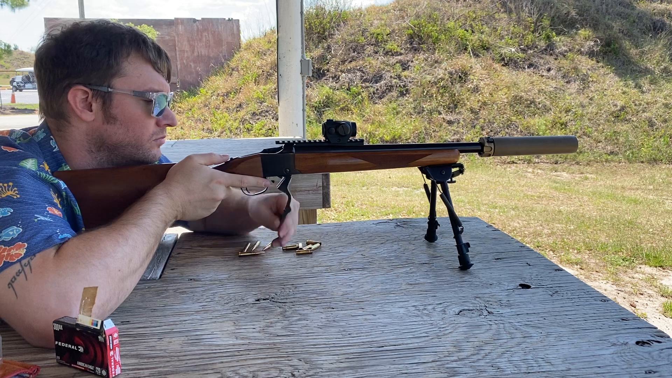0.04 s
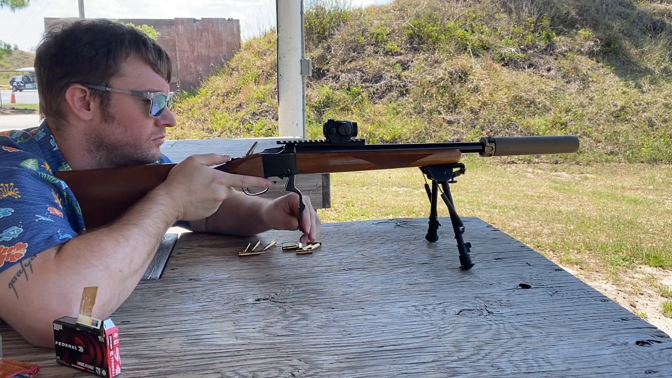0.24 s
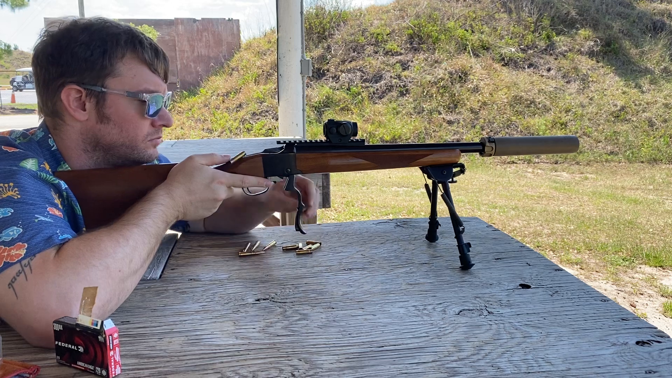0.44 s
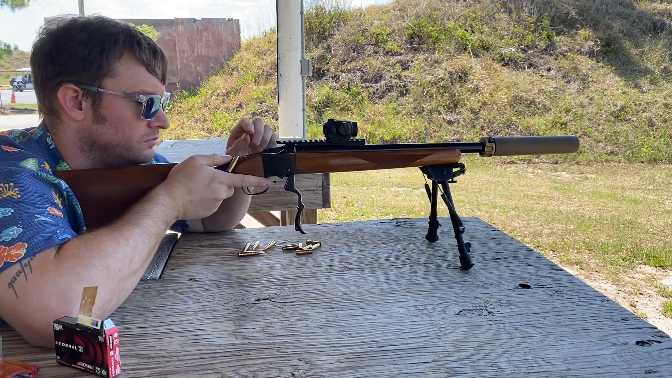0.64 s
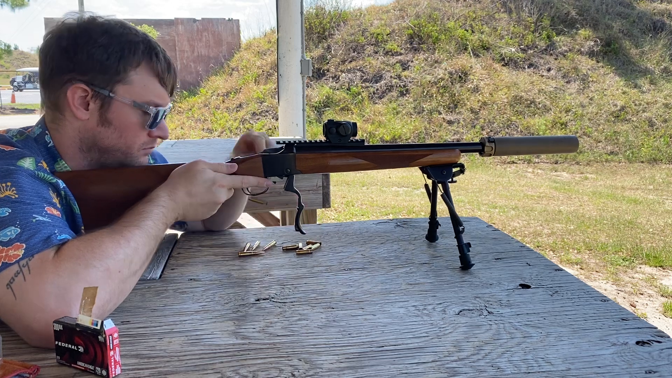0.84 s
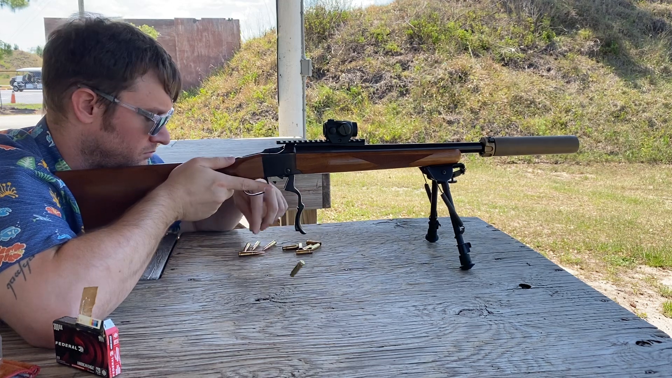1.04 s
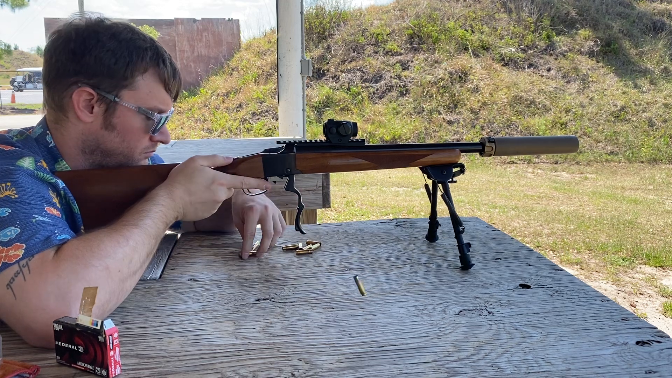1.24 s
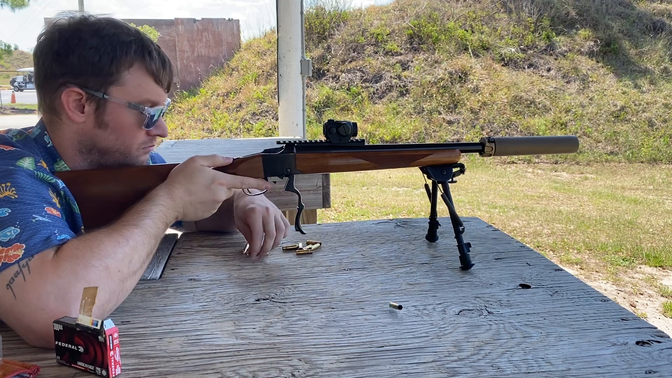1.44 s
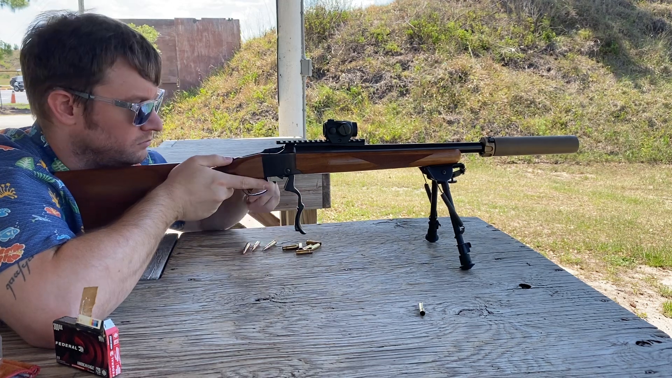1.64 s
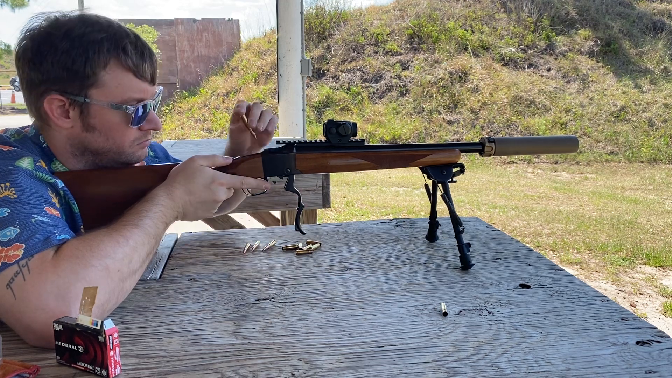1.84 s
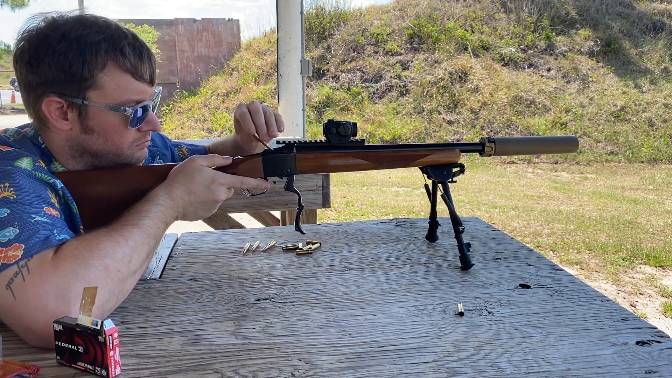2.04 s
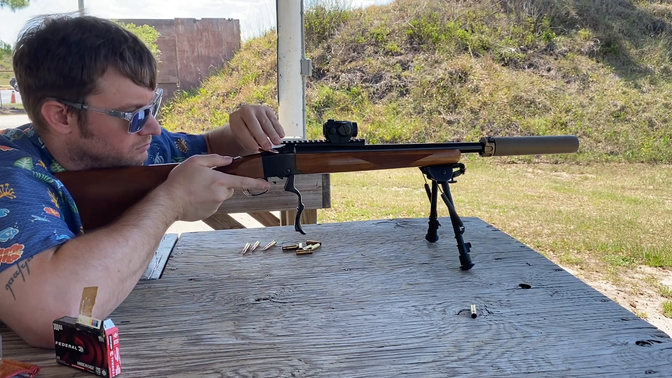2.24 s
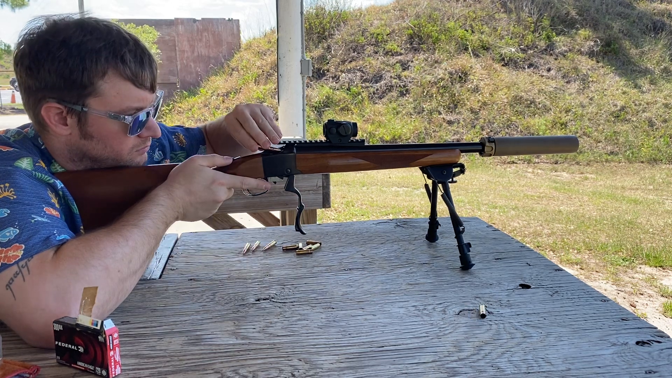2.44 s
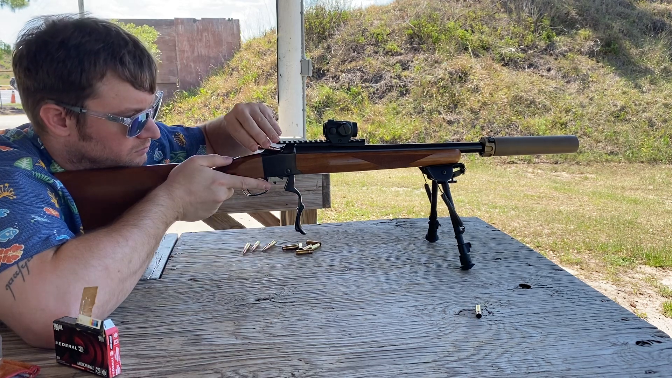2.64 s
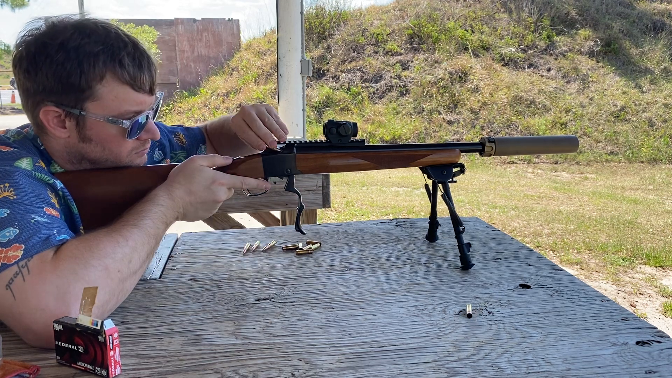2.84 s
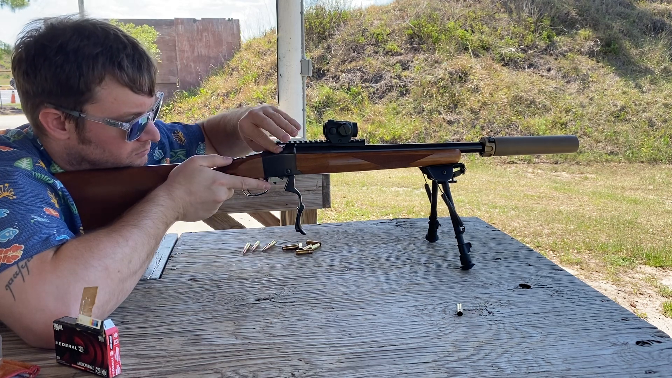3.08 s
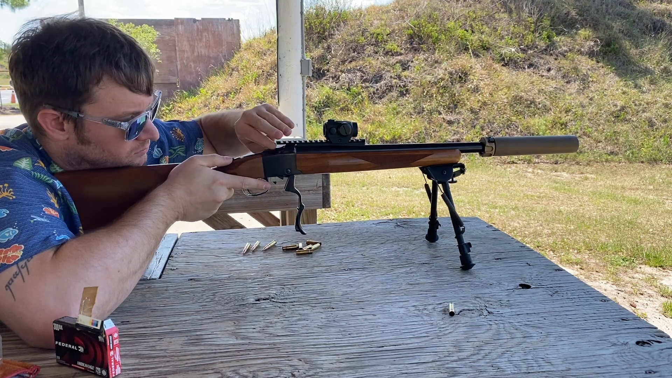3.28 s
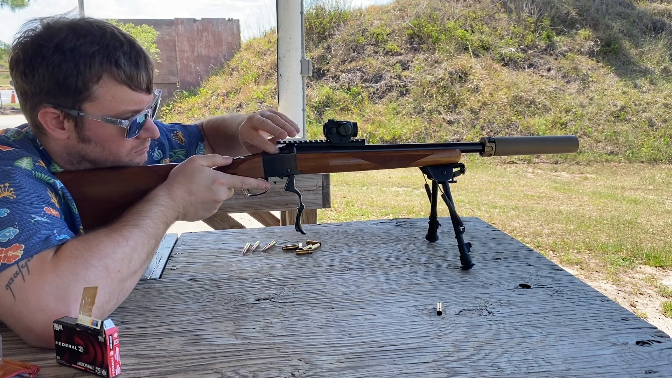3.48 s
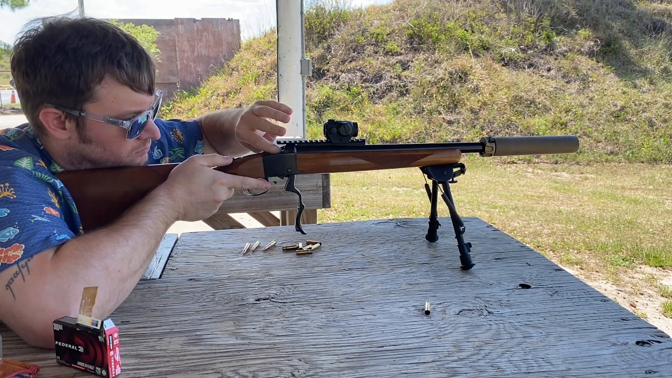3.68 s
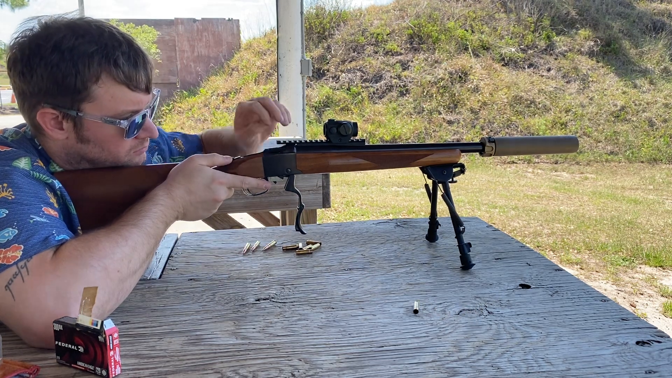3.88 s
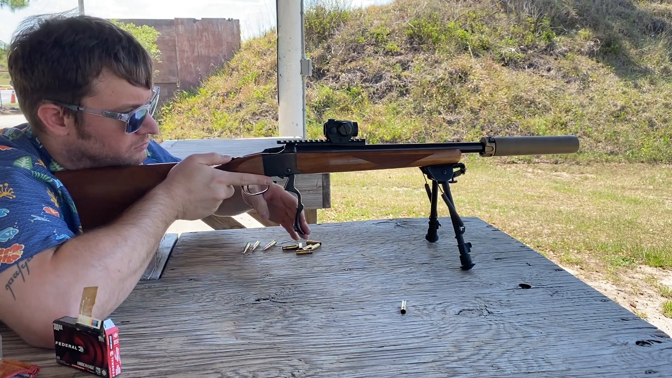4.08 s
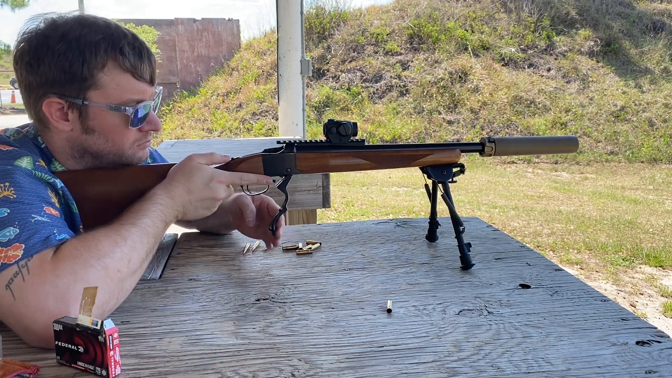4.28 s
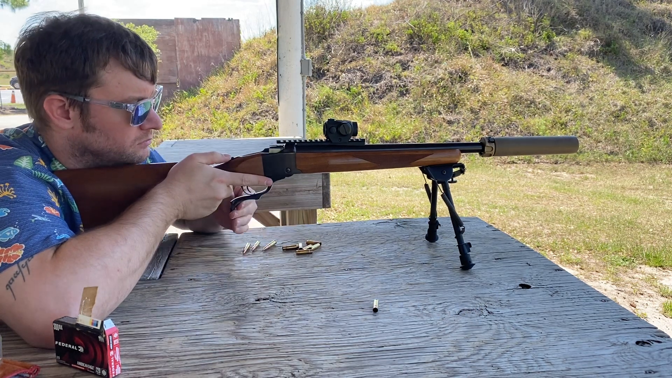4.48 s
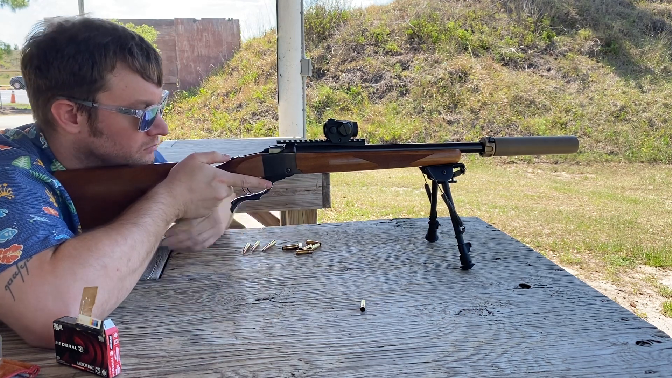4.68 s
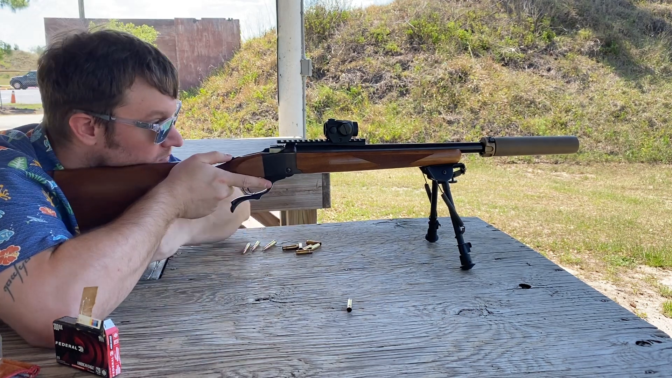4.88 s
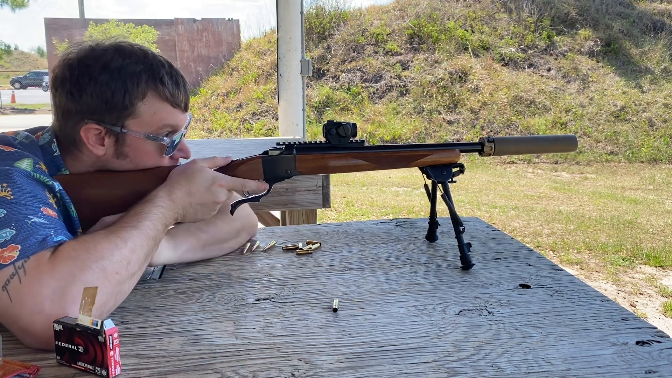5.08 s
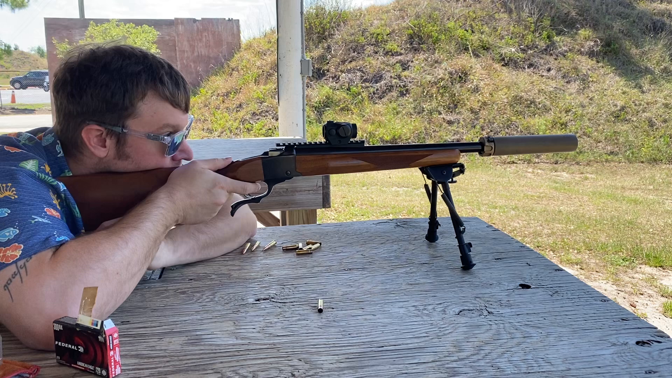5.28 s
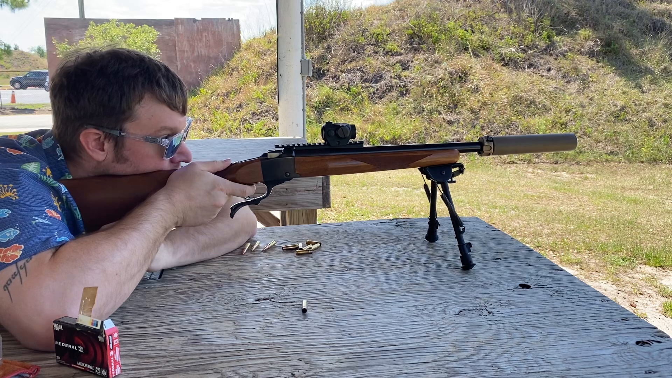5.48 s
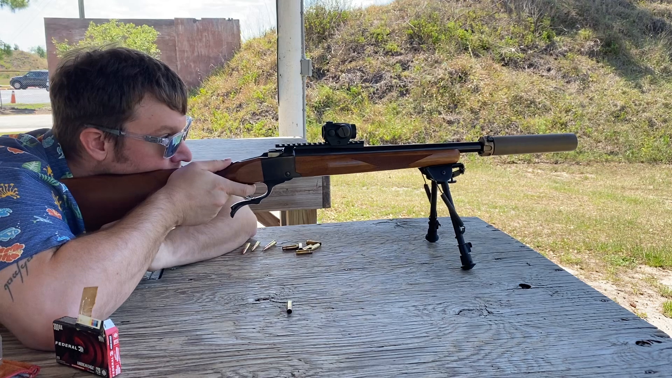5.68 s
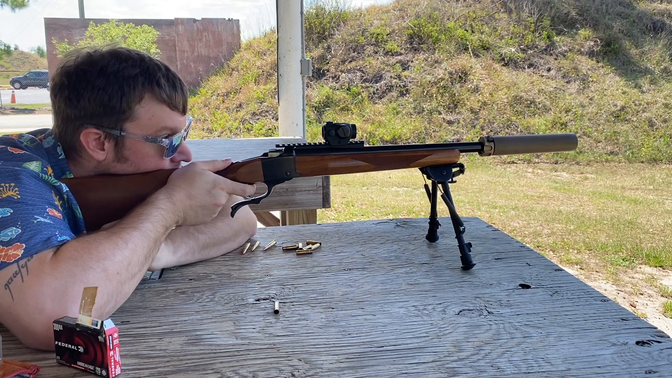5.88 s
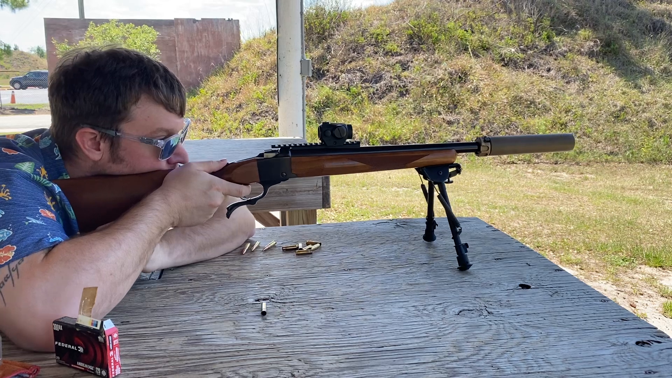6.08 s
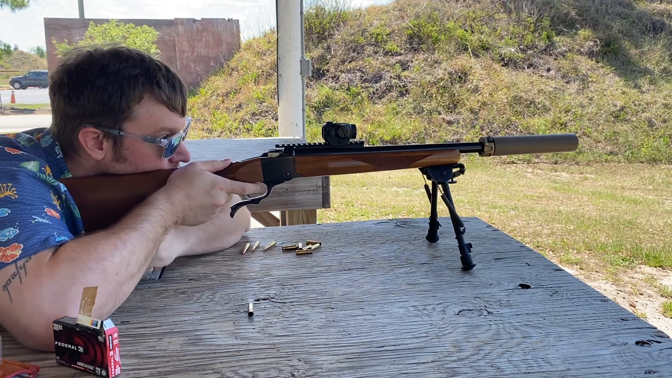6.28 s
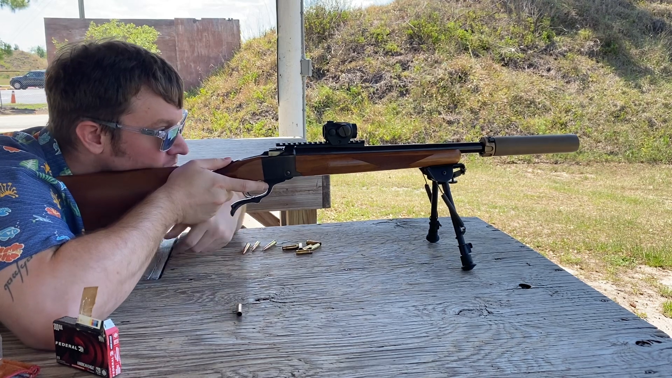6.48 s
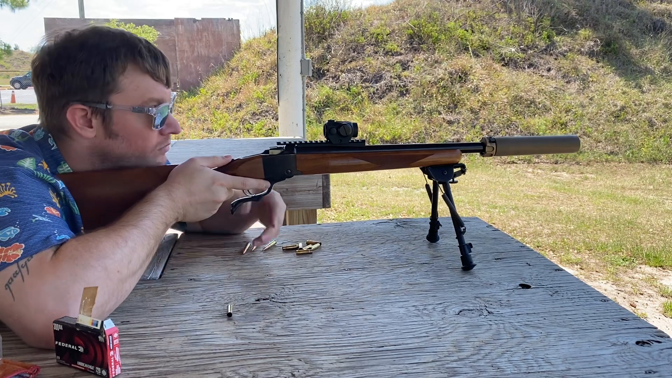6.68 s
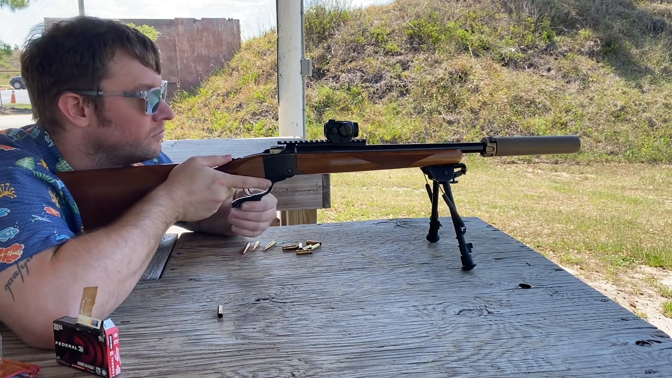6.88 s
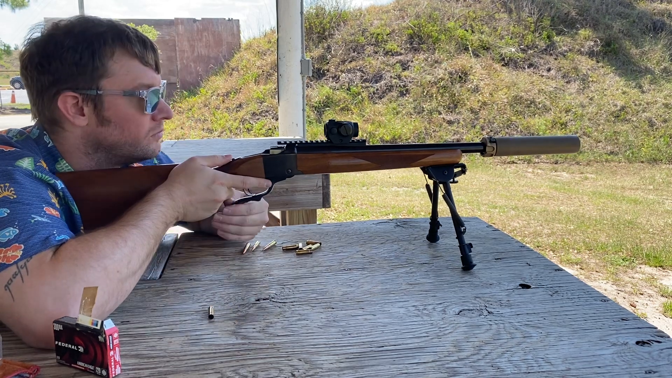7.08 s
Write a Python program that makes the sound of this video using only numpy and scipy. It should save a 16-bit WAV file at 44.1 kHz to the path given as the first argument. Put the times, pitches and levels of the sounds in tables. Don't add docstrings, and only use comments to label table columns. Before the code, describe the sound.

Stereo phone microphone about a metre from a plywood bench, under a shelter at a breezy outdoor range, with soft distant road noise and faint motor hum. From 0 to 0.55 s brass cartridges jingle brightly in fingers. At 0.96 s a spent case hits the plywood sharply, bounces with woody knocks to about 1.6 s, then rolls to rest by 2. Wind buffets low, strongest around 2.5-3.4 s; thin falling bird whistles recur from 2.2 s. Light ticks and a brief rasp at 3.0-3.2 s seat a cartridge; small clicks follow at 3.5. Two hard steel clacks land at 4.33 and 4.36 s. Soft hand pats and nudges continue to 5.9 s, a far car passing around 5.3. At 6.0 s a hammer click becomes a gas crack with a low thump, then a snap at 6.15, a flickering wash, a weaker snap at 6.37 and a duller slope echo, gone by 6.8. A faint metal tick ends it near 7.0.

```python
import sys
import numpy as np
from scipy import signal
from scipy.fft import rfft, irfft, next_fast_len
from scipy.io import wavfile
from scipy.ndimage import uniform_filter1d

SR = 44100
rng = np.random.default_rng(int(sys.argv[2]) if len(sys.argv) > 2 else 0)


def to_wav(s):
    ch = np.atleast_2d(s).T
    pcm = np.round(np.clip(ch, -1, 1) * 32767)
    wavfile.write(sys.argv[1], SR, pcm.astype(np.int16))


def voltage_ratio(decibels):
    exponent = np.asarray(decibels, float) / 20
    return 10 ** exponent


N = 313992
T = np.arange(N) / SR
BAND_HZ = 250 * 2 ** np.arange(0, 6.2, .5)
OPPOSITE = np.array([[1], [-1]])
BOTH = np.ones((2, 1))


def table(points, hz):
    p = np.array(points)
    return np.interp(np.log(np.maximum(hz, 1)), np.log(p[:, 0]), p[:, 1])


def unit(x):
    return x / np.sqrt(np.mean(x ** 2))


def noise(gain, like_hz, size=N):
    fast = next_fast_len(size)
    hz = np.arange(fast // 2 + 1) * SR / fast
    mid, side = rfft(rng.standard_normal((2, fast)))
    like = 1 / (1 + hz / like_hz)
    stereo = np.sqrt(1 + like) * mid + np.sqrt(1 - like) * side * OPPOSITE
    return unit(irfft(gain(hz) * stereo, fast)[:, :size])


def walk(rate):
    k = int(SR / rate)
    steps = np.repeat(rng.standard_normal(N // k + 1), k)
    return unit(uniform_filter1d(uniform_filter1d(steps, k), k)[:N])


def curve(rows, column):
    points = np.array(rows)
    return np.interp(T, points[:, 0], points[:, column])


def during(rows):
    inside_s = np.minimum(T - rows[0][0], rows[-1][0] - T)
    return voltage_ratio(curve(rows, 1)) * np.clip(inside_s / 0.017, 0, 1)


def pan(db):
    return voltage_ratio(db * OPPOSITE / 2)


def add(out, s, piece):
    i = int(s * SR)
    out[..., i:i + piece.shape[-1]] += piece[..., :N - i]


def fade(t, t60):
    return np.exp(-np.log(1000) * t / t60)


def swoop(t, start_hz, end_hz, glide_s):
    return 2 * np.pi * (end_hz * t + (start_hz - end_hz) * glide_s * (1 - np.exp(-t / glide_s)))


def scatter_bands():
    bands = np.array([noise(lambda hz: np.exp(-(3.4 * np.log2(hz / f + 1e-9)) ** 2), 1500, size=SR)
                      for f in BAND_HZ])
    bands[-4:, 1] = irfft(rfft(bands[-4:, 0]) * np.exp(-1.65j) * voltage_ratio(1.5), SR)
    return bands


def hits(bands, events, colour, modes, crack_s, tail_s, dull, ring_db, trim_db, place_db,
         bright_db=0, rise_s=.00025):
    out, t = np.zeros((2, N)), T[:SR // 4]
    octave = np.log2(BAND_HZ / 2000)[:, None]
    rise = 1 - np.exp(-t / rise_s)
    crack = fade(t, crack_s + 6 / BAND_HZ[:, None])
    crack = (crack + voltage_ratio(4.5) * fade(t, 0.0025 + 3 / BAND_HZ[:, None])) * rise
    tail = fade(t, tail_s * 2 ** (-dull * octave)) * (1 - np.exp(-t / .002))
    tail = tail * voltage_ratio(-1.8 * np.maximum(octave, 0))
    shake = walk(150)
    rough = voltage_ratio(3.2 * shake[:SR]) * np.exp(.55j * shake[SR:2 * SR])
    m = np.array(modes)
    dying = fade(t, m[:, 2:]) * voltage_ratio(ring_db + m[:, 1:2]) * rise
    all_luck = rng.standard_normal((len(events), 4, len(BAND_HZ), 1))
    for (s, db, tail_db, *tilt), luck in zip(events, all_luck):
        tilt_db = bright_db + sum(tilt)
        pan_db = place_db + 0.6 * luck[0, -1, 0]
        scatter_db = 2 * np.tanh(luck[3, :, 0])
        band_db = table(colour, np.minimum(BAND_HZ, 12000)) + tilt_db * octave[:, 0] / 2 + scatter_db
        gain = voltage_ratio(band_db) * np.sqrt(BAND_HZ)
        gain[-1] *= voltage_ratio(min(0.2 * (db + 5.0), 0))
        shape = gain[:, None] / np.linalg.norm(gain) * (crack + voltage_ratio(tail_db) * tail)
        i = int(s * SR) % (bands.shape[2] - len(t))
        burst = np.einsum("bct,bt->ct", bands[:, :, i:i + len(t)], shape)
        luck = luck[:, :len(m)]
        mode_hz = m[:, :1] * (1 + 0.012 * luck[0])
        ring = voltage_ratio(4 * np.tanh(luck[1])) * dying * np.exp(2j * np.pi * mode_hz * t)
        turn = np.exp(.8j * np.tanh(luck[2].T) * OPPOSITE)
        blow = burst + np.imag(turn @ ring * rough[i:i + len(t)])
        peak = np.abs(blow[:, :SR // 150]).max(1).mean()
        add(out, s, voltage_ratio(db + trim_db) * pan(pan_db) * blow / peak)
    return out


# pitch in Hz, level in dB per Hz.
AIR_COLOUR = [(120, -49), (200, -22.5), (230, 0.5), (265, -7.5), (405, -5.5), (590, -12), (960, -17.5),
              (1800, -25.5), (3110, -28.5), (8500, -42.5)]


def field():
    air = noise(lambda hz: voltage_ratio(table(AIR_COLOUR, np.minimum(hz, 8500))) / (1 + (hz / 10000) ** 7), 310)
    air = air * voltage_ratio(-59 + 0.33 * walk(4.6) + 0.27 * walk(32))
    hum_hz = 241 * (1 + 0.01 * walk(1.8))
    hum = voltage_ratio(-64.5 + 1.6 * walk(8.4)) * np.sin(2 * np.pi * np.cumsum(hum_hz) / SR)
    car_s, car_length_s, car_db = 5.326, 0.54, -64
    car = noise(lambda hz: hz / (1 + (hz / 1100) ** 4.6), 500) * voltage_ratio(car_db + 1.1 * walk(8.2))
    return air + hum + car * np.exp(-((T - car_s) / car_length_s) ** 2)


# time in seconds, gust level in dB.
GUSTS = [(0.0, -52.5), (0.6, -58), (1.0, -51), (1.48, -45.5), (1.89, -52.5), (2.21, -48.5), (3.4, -51.5),
         (4.51, -49.5), (5.19, -58.5), (5.67, -46), (5.97, -55), (6.3, -52.5), (6.974, -49.5), (7.12, -50)]
# start in seconds, peak in dB,
# pitch in Hz.
EDDIES = [(0.226, -40.5, 114.5), (0.834, -42, 126), (0.867, -39.5, 167), (0.889, -41.5, 110),
          (1.169, -38.5, 68), (1.603, -30.5, 139), (1.668, -36, 70.5), (1.966, -36, 144),
          (2.137, -33, 77.4), (2.216, -35.5, 88), (2.277, -37.5, 68.4), (2.369, -43.5, 126.4),
          (2.485, -30, 67.4), (2.569, -36.5, 188), (2.589, -26, 60.6), (2.657, -41, 143),
          (2.718, -36.5, 171), (2.749, -34.5, 96), (2.853, -40.5, 97.6), (2.971, -37, 62.6),
          (2.999, -33.5, 192), (3.258, -33.5, 92), (3.289, -34, 55.7), (3.32, -33.5, 156),
          (3.347, -33.5, 100), (3.381, -31, 68), (3.726, -36, 121), (3.954, -37.5, 101), (2.548, -48, 378),
          (2.577, -37.5, 330), (2.638, -48, 333), (2.722, -38.5, 342), (2.777, -50, 328), (2.964, -50, 350),
          (2.996, -43, 400)]
# start
# in seconds, peak in dB, pitch in Hz.
BENCH_THUDS = [(0.488, -37, 109), (.508, -38, 132), (0.528, -38, 103.5), (2.104, -30.5, 198),
               (3.508, -28, 74), (4.318, -31, 75.4), (4.669, -36, 118), (4.698, -28.5, 123.4),
               (5.659, -46, 89.6), (5.719, -43.5, 220), (6.365, -39.5, 158), (6.468, -41, 102),
               (6.508, -42, 54), (6.558, -39, 126), (6.949, -38, 90.5)]


def wind_and_thuds():
    rumble = noise(lambda hz: (hz / 50) ** 3 / (1 + (hz / 62) ** 5), 60) * voltage_ratio(3 * walk(25))
    flutter = noise(lambda hz: (hz / 150) ** 0.59 / (1 + (hz / 300) ** 5), 500) * voltage_ratio(3.5 * walk(35))
    out, shed, t = np.zeros((2, N)), np.zeros(N), T[:SR // 8]
    thumps = EDDIES + BENCH_THUDS
    for (s, db, hz), luck in zip(thumps, rng.uniform(-0.95, 1, (len(thumps), 2))):
        u = t / min(0.0086, 1 / hz)
        swell = voltage_ratio(db) * u * np.exp(1 - u)
        phase = swoop(t, 1.76 * hz, 0.835 * hz, 0.0058) + np.pi * luck[0] + 0.34 * luck[1] * OPPOSITE
        add(out, s, voltage_ratio(1.0) * swell * np.sin(phase))
        add(shed, s - .004, voltage_ratio(-12.0) * swell)
    gust_db = curve(GUSTS, 1)
    flutter_db = -63.5 + 2.1 * (gust_db + 51.5)
    return out + voltage_ratio(gust_db) * rumble + (voltage_ratio(flutter_db) + shed) * flutter


# start in seconds, peak in dB, tail in dB, treble tilt in dB.
JINGLES = [(0.0095, -44, -4, -14), (0.0604, -18.5, -18, -6.5), (0.0914, -14, -17, 4),
           (0.1377, -25.5, -1, 4), (0.1442, -16, -23, -2), (0.2092, -25.5, -16, 0), (0.238, -42.5, -4, -8),
           (0.2549, -36, -26, -14.5), (0.2614, -27, -18, -1), (0.3194, -31, -9, -11),
           (0.371, -22.5, -26, 4.5), (0.3898, -33.5, -25, -7), (0.405, -43, -23, 5),
           (0.4137, -43, -6.5, -9.5), (0.46, -41, -10, -9), (0.4743, -37.5, -10, -0.5),
           (0.5475, -40.5, -27, -5)]
# pitch in Hz, level in dB per Hz.
BRASS_COLOUR = [(590, -29), (1000, -17), (1450, -15), (2230, -4.5), (4080, -4), (10800, 1.5), (12500, 4)]
# pitch in Hz, level in dB, time to fade by 60 dB in seconds.
BRASS_RING = [(2250, -6, .04), (4660, 0, .05), (4790, -4, .04), (7190, -12, .05), (10200, -6, .03)]


def jingle(bands):
    return hits(bands, JINGLES, BRASS_COLOUR, BRASS_RING, 0.011, 0.17, 0.1, -26.0, -0.52,
                place_db=2.5, rise_s=0.00069)


def roof(near):
    t = T[:SR // 2]
    echo = noise(lambda hz: (hz > 250) / (1 + (hz / 3500) ** 2), 600, size=len(t))
    echo = echo * fade(t, 0.24) * (t > .008)
    echo = echo / np.linalg.norm(echo[0])
    return near + voltage_ratio(-14.5) * signal.fftconvolve(near.mean(0, keepdims=True), echo, axes=1)[:, :N]


# start in seconds, peak in dB,
# pitch in Hz, fade by 60 dB in seconds.
PING_NOTES = [(.061, -38.5, 2310, 0.083), (.0915, -40, 6150, 0.018), (.137, -41, 4720, 0.028),
              (.145, -31, 4870, 0.041), (.145, -36, 2330, 0.035), (0.208, -39.5, 4750, 0.061),
              (.247, -48, 2300, .02), (.277, -46.5, 2400, 0.014), (.321, -49, 2220, 0.048),
              (.321, -43, 4750, .03), (.321, -41, 6270, 0.013), (3.06, -56, 4460, .04),
              (3.035, -51, 1990, .05), (3.11, -52, 968, 0.09), (.389, -47, 4740, 0.027),
              (.389, -55, 2240, .08), (.397, -44, 4770, .03), (.405, -41, 4740, 0.02),
              (.415, -49, 4740, 0.064), (.473, -51, 4700, 0.023), (3.11, -54, 1606, 0.074),
              (3.035, -56, 980, .06), (.547, -50.5, 4880, .02), (2.1, -51, 5400, .03),
              (2.797, -55, 9700, .02), (2.815, -48, 9600, 0.022), (3.05, -47.5, 6300, .04),
              (3.052, -58, 4620, 0.057), (3.502, -46, 6400, .015), (3.507, -54.5, 5320, 0.12),
              (3.509, -48, 2600, .015), (3.522, -40.5, 2620, 0.024), (3.551, -41, 6400, 0.013),
              (3.551, -43, 2155, 0.048), (4.092, -53.5, 2400, 0.019), (4.229, -38, 5240, .01),
              (4.231, -42, 2200, 0.024), (4.246, -48, 9000, .012), (4.334, -22, 2670, 0.014),
              (4.364, -26, 2570, 0.038), (4.366, -22.5, 7180, 0.016), (6.0045, -23, 698, 0.013),
              (6.0118, -16, 810, 0.0088), (6.1473, -23, 3700, 0.0061), (6.1478, -27, 6740, 0.0074),
              (6.1476, -32, 2290, 0.0099), (6.367, -33, 2400, .008), (6.366, -35, 5770, 0.0087),
              (6.926, -61, 5420, 0.018)]


def pings():
    out, t, wobble = np.zeros((2, N)), T[:SR // 8], walk(200)
    for (s, db, hz, t60), luck in zip(PING_NOTES, rng.standard_normal((len(PING_NOTES), 1))):
        loudness = voltage_ratio(db) * fade(t, t60) * (1 - np.exp(-t / .0006))
        shaken = .4 * wobble[int(s * SR):][:len(t)]
        add(out, s, loudness * np.sin(2 * np.pi * hz * t + shaken + .9 * np.tanh(luck) * OPPOSITE))
    return out * voltage_ratio(4.5 * walk(350)) * pan(1.5)


# start in seconds, peak in dB, tail in dB.
BENCH_KNOCKS = [
    (0.1044, -30.5, 10),
    (1.115, -32.5, 10.5),
    (1.205, -30.5, -13),
    (4.0955, -35, -5),
    (1.314, -31, -10),
    (4.128, -45, -6),
]
# pitch in Hz, level in dB per Hz.
PALM_COLOUR = [(250, -7), (400, 7.5), (1500, -6.5), (3500, -38), (8000, -61.5), (16000, -64)]
# pitch in Hz, level in dB, time to fade by 60 dB in seconds.
KNOCK_RING = [(374.5, 10.5, 0.12), (912, -28.5, 0.1)]


def knocks(bands):
    return hits(bands, BENCH_KNOCKS, PALM_COLOUR, KNOCK_RING, 0.024, 0.056, 0.054, 5.3, -0.69,
                place_db=-0.5, rise_s=0.001524)


# start in seconds, peak in dB.
TUBE_NOTES = [(0.165, -51), (.21, -49), (.33, -49), (.385, -51), (.43, -57), (1.113, -52), (1.2, -53),
              (1.35, -53), (1.585, -61), (1.868, -67), (.46, -63)]
# start in seconds, peak in dB.
MOUTH_NOTES = [
    (1.11, -66),
    (1.39, -64),
]


def tubes():
    out, t = np.zeros((2, N)), T[:SR // 9]
    swell = fade(t, .25) * np.sqrt(np.abs(np.sin(np.pi * (t / t[-1]) ** .5)))
    for rows, hz in [(TUBE_NOTES, 8586), (MOUTH_NOTES, 7430)]:
        for s, db in rows:
            add(out, s, voltage_ratio(db) * swell * np.sin(2 * np.pi * hz * t + .7 * OPPOSITE))
    return out * voltage_ratio(4 * walk(90) - 2)


# start in seconds, peak in dB, tail in dB, treble tilt in dB.
BREECH_TOUCHES = [(0.8675, -55.5, -3, 6.5), (2.0803, -40, -4, -16), (2.1, -45, -5, -8.5),
                  (2.724, -53, -15, 6), (2.797, -48, -1, 5), (2.812, -45, -2, 2), (3.003, -46.5, -9, 0),
                  (3.032, -52, -5, 2), (3.042, -51, -6, 7), (3.051, -48, -4, 0), (3.07, -46, -3, 0),
                  (3.128, -44, -9, -11), (3.502, -44, -1, 11), (3.506, -40.5, 3, 0), (3.521, -37, -22, -3),
                  (3.552, -35.5, -18, -3.5), (4.09, -61, -13, 4), (4.1013, -55, -16, 11.5),
                  (4.2103, -49.5, -3, -8), (6.773, -51, -5, -1)]
# pitch in Hz, level in dB per Hz.
BREECH_COLOUR = [(290, -21), (500, -11.5), (800, -15), (1430, -14), (2300, -4.5), (3870, -10.5),
                 (6500, -12), (10000, -15.5), (12000, -21.5)]
# start in seconds, peak in dB, tail in dB, treble tilt in dB.
LEVER_CLACKS = [(2.1116, -32, -10, -2), (2.13, -35, -20, -4), (4.2295, -33, -12.5, -5),
                (4.2386, -44, -10, -7), (4.246, -46, -9.5, -5), (4.326, -36, -11.5, -2.5),
                (4.3315, -9.5, -21, 5), (4.3342, -20, -16, -3.5), (4.3626, -17, -21, 2.5),
                (4.3636, -12, -20, 2.5), (4.3659, -9, -17.5, 0.5), (4.37, -19, -15, -6),
                (4.377, -21.5, -14, -6), (7.018, -32.5, -14, 13), (7.02, -39, -5.5, -4)]
# pitch in Hz, level in dB per Hz.
STEEL_COLOUR = [(290, -18.5), (500, -13), (800, -12), (1430, -16.5), (2550, -10.5), (3870, -12.5),
                (11200, -8.5), (12500, -11.5)]
# pitch in Hz, level in dB, time to fade by 60 dB in seconds.
STEEL_RING = [(2080, 3, .03), (2750, 2, .025), (2480, 3, .03), (4400, -12, .07), (4980, -9, .04),
              (9900, -14.5, .06)]


def steel_action(bands):
    loading = hits(bands, BREECH_TOUCHES, BREECH_COLOUR, STEEL_RING[:5], 0.009, 0.08, .15, -15.5, -0.01,
                   place_db=2.5, rise_s=0.00072)
    lever = hits(bands, LEVER_CLACKS, STEEL_COLOUR, STEEL_RING, 0.011, 0.18, 0.12, -19, -0.76,
                 place_db=2.0, rise_s=0.00061)
    return loading + lever


# start in seconds, peak in dB, tail in dB, treble tilt in dB.
CASE_BOUNCES = [(0.9593, -7.5, -10, 0), (0.9694, -21, -10, 0), (1.113, -19, -14, -2.5),
                (1.1223, -26.5, -9, -10), (1.3185, -24.5, -9, -9), (1.1947, -18.5, -13, 7.5),
                (1.2055, -21.5, -7.5, 0.5), (1.3124, -17.5, -6, -2.5), (1.345, -18.5, -9, 6.5),
                (1.476, -21, -9.5, -8), (1.5317, -22, -10, -6.5), (1.585, -26.5, -9, 4),
                (1.61, -37.5, -4, -9), (1.657, -46, -12, -8), (1.68, -40.5, 2, -9), (1.689, -43, -9, -5),
                (1.702, -33, -9.5, 0.5), (1.787, -40, -3, 2), (1.869, -40.5, -8, 5), (1.886, -41, -12, -2),
                (1.894, -40, -9, -4), (1.4, -33, -4, -23), (1.448, -36, -7, -11), (1.493, -39, -8, -2)]
# pitch in Hz, level in dB per Hz.
BENCH_COLOUR = [(250, -28), (400, -8.5), (586, -0.5), (1040, 0.5), (1500, 4), (2240, -1), (3800, -8.5),
                (12500, -29)]
# pitch in Hz, level in dB, time to fade by 60 dB in seconds.
BENCH_RING = [(385, -6, .08), (520, -6, .08), (628, -1, .1), (720, -5, .07), (940, -2, .07),
              (1100, -4, .05), (1346, -3, .05), (1500, -4, .04), (1816, -2, .04), (2180, -8, .04),
              (3320, -9, .03)]


def case_bouncing(bands):
    return hits(bands, CASE_BOUNCES, BENCH_COLOUR, BENCH_RING, 0.0092, 0.08, 0.06, -12.0, -1.65, place_db=2.0)


# time in seconds, level in dB.
ROLL_LEVEL = [
    (1.38, -48),
    (1.958, -63.5),
    (2.08, -75),
]


def rolling():
    roll = noise(lambda hz: sum(voltage_ratio(db) / (1 + ((hz - f) / 30) ** 2) for f, db, _ in BENCH_RING[1:6]), 900)
    return roll * voltage_ratio(3 * walk(40)) * during(ROLL_LEVEL) * voltage_ratio(-3.5) * pan(2.2)


# start in seconds, length in seconds, first pitch in Hz, last pitch in Hz, level in dB.
WHISTLES = [(2.234, 0.096, 7530, 6280, -69), (2.446, 0.15, 8180, 7330, -65.5),
            (2.636, 0.077, 7850, 6300, -64.5), (3.086, .05, 7440, 6870, -71),
            (3.25, 0.042, 9960, 9800, -75.5), (3.274, .07, 7520, 6040, -69), (4.119, 0.12, 7580, 7270, -69),
            (4.642, .131, 7570, 6020, -67), (5.524, 0.13, 7800, 7270, -68.5),
            (5.756, 0.037, 7400, 6730, -74), (6.735, 0.098, 7760, 6700, -65.5)]


def bird():
    out, waver = np.zeros((2, N)), walk(110)
    for start, length, first_hz, last_hz, db in WHISTLES:
        on = slice(int(start * SR), int((start + length) * SR))
        u = (T[on] - start) / length
        hz = (first_hz - (first_hz - last_hz) * np.abs(u) ** 2.8) * (1 + 0.0021 * waver[on])
        swell = np.abs(np.sin(np.pi * np.abs(u) ** 3.7)) ** 0.23
        tone = np.sin(2 * np.pi * np.cumsum(hz) / SR + .6 * OPPOSITE)
        out[:, on] += voltage_ratio(db - 2.0 + 2.0 * waver[on]) * swell * tone
    smear = rng.standard_normal((2, SR // 8)) * fade(T[:SR // 8], 0.23)
    smear = smear / np.linalg.norm(smear[0])
    return out + voltage_ratio(1.5) * signal.fftconvolve(out, smear, axes=1)[:, :N]


# start in seconds, peak in dB, tail in dB.
HAND_TAPS = [(2.281, -46.5, 0), (2.289, -51.5, 0), (3.874, -45.5, 0), (3.906, -47, -12), (4.745, -46, 10.5),
             (5.39, -50.5, 4), (5.443, -51, -10), (5.485, -57, 2), (5.645, -50, 1), (5.86, -53.5, 0),
             (5.885, -49.5, 2), (5.536, -51, -1.5), (5.705, -46.5, 3), (5.719, -46, 1), (5.735, -48.5, -4)]


def hands(bands):
    return hits(bands, HAND_TAPS, PALM_COLOUR, BENCH_RING, 0.024, 0.055, .1, -11.0, 2.6,
                place_db=3.0, bright_db=11.5)


# time in seconds, level in dB.
SLIDE_LEVEL = [
    (3.01, -62),
    (3.056, -52.5),
    (3.095, -59),
    (3.11, -63),
    (3.17, -71),
]
# pitch in Hz, level in dB per Hz.
SCRAPE_COLOUR = [(410, -34), (700, -3), (977, -1.5), (1460, -14), (1980, -3), (2500, -23), (4500, -16),
                 (5000, -17), (6210, -13), (12000, -44), (15600, -67)]


def sliding():
    rasp = noise(lambda hz: voltage_ratio(table(SCRAPE_COLOUR, hz)), 2000) * voltage_ratio(3.5 * walk(200))
    return rasp * during(SLIDE_LEVEL) * voltage_ratio(-1.0) * pan(1.5)


# start in seconds, peak in dB, tail in dB, treble tilt in dB.
REST_NUDGES = [
    (5.7047, -41, -15.5, 1.5),
    (5.719, -44, -10, 0.5),
    (5.443, -53, -12, 3),
]


def nudges(bands):
    return hits(bands, REST_NUDGES, BENCH_COLOUR, BENCH_RING, .008, .06, .1, -18, 0, place_db=2.5)


# pitch in Hz, width in Hz, level in dB.
SWELL_BANDS = [(2200, 99, 0.5), (3200, 170, -9.5), (3955, 59, -8.5), (4740, 89, -5.5), (5900, 73, -11),
               (6560, 100, -0.5), (6900, 95, -7), (8150, 96, -11), (700, 250, -5)]


def swell_before_shot():
    def colour(hz):
        parts = sum(voltage_ratio(db) / (1 + ((hz - f) / w) ** 2) for f, w, db in SWELL_BANDS)
        allowed = (hz > 300) * (hz < 8500) * (np.abs(hz - 1500) > 350)
        return allowed * (.14 / np.sqrt(hz + 900) + .03 * parts)

    out, t = np.zeros((2, N)), T[:SR // 45]
    rising_noise = noise(colour, 300, size=len(t))
    add(out, 5.986, voltage_ratio(-24.5) * pan(-11.5) * rising_noise * (t / 0.021) ** 1.5)
    return out


# start in seconds, peak in dB, tail in dB, treble tilt in dB.
BLAST_CRACKS = [
    (6.0016, -16.5, -13.5, 2.5),
    (6.0077, -12.5, -15, 6),
    (6.008, -5, -11.5, 7.5),
    (6.0099, -9.5, -10, 5.5),
    (6.0109, -14, -8, 4),
]
# pitch in Hz, level in dB per Hz.
GAS_COLOUR = [(290, -23.5), (500, -1.5), (780, -8.5), (1450, -11), (2200, -6), (4000, -12), (11500, -12),
              (12500, -15)]


def shot(bands):
    muzzle_s, t = 6.0115, T[:SR // 4]
    out = hits(bands, BLAST_CRACKS, GAS_COLOUR, STEEL_RING, 0.0075, 0.19, 0.029, -38.0, -0.1, place_db=1.7)
    puff = voltage_ratio(-5.0) * np.exp(-((t - .0056) / 0.0026) ** 4)
    add(out, muzzle_s, -puff * np.sin(swoop(t, 280, 76, 0.015)) * BOTH)
    boom = voltage_ratio(-20) * fade(t, .1) * np.sin(2 * np.pi * 108 * t)
    add(out, muzzle_s + .0095, -boom * BOTH)
    add(out, muzzle_s, -voltage_ratio(-8) * np.exp(-((t - .0011) / .0003) ** 2) * pan(3))
    return out


# time in seconds, level in dB.
BANK_LEVEL = [
    (6.08, -46),
    (6.14, -58.5),
    (6.165, -47.5),
    (6.21, -53),
    (6.278, -54),
    (6.292, -49),
    (6.41, -54),
    (6.5, -66),
    (6.8, -94.5),
]
# pitch in Hz, level in dB per Hz.
WASH_COLOUR = [(350, -40), (600, 1.5), (1100, -3.5), (3120, 1.5), (6790, 0.5), (11800, -16), (13200, -34),
               (15000, -19), (16500, -51.5)]


def bank_wash():
    return noise(lambda hz: voltage_ratio(table(WASH_COLOUR, hz)), 900) * during(BANK_LEVEL) * voltage_ratio(2.4 * walk(140))


# start in seconds, peak in dB, tail in dB.
SNAP_ECHOES = [
    (6.1476, -18.5, -29),
    (6.3665, -29.5, -33),
]
# pitch in Hz, level in dB per Hz.
SNAP_COLOUR = [(500, -11), (1500, -6.5), (3500, 10), (5000, 0), (6700, 6), (12000, -13), (16000, -29)]
# pitch in Hz, level in dB, time to fade by 60 dB in seconds.
SNAP_RING = [(3600, 0.5, .006), (6800, 1.5, .006)]


def snaps(bands):
    return hits(bands, SNAP_ECHOES, SNAP_COLOUR, SNAP_RING, 0.0073, .05, 0.056, 1, -0.9, place_db=-8.0)


# time in seconds, level in dB, centre pitch in Hz.
SLOPE_ECHO = [
    (6.27, -66, 4300),
    (6.31, -60, 4000),
    (6.375, -52, 3350),
    (6.46, -56.5, 3600),
    (6.53, -66, 3200),
    (6.66, -69.5, 2920),
    (6.76, -82, 2600),
]


def slope():
    phase = 2 * np.pi * np.cumsum(curve(SLOPE_ECHO, 2)) / SR
    a, b = (noise(lambda hz: 1 / (1 + (hz / 1030) ** 2), 90) for _ in range(2))
    return (a * np.cos(phase) + b * np.sin(phase)) * during(SLOPE_ECHO) * voltage_ratio(2.3 * walk(70))


def scene():
    bands = scatter_bands()
    chatter = bands * voltage_ratio(2.5 * walk(900)[:SR])
    bench = jingle(chatter) + pings() + knocks(chatter) + tubes() + steel_action(chatter)
    bench += case_bouncing(chatter) + rolling() + hands(chatter) + sliding() + nudges(chatter)
    firing = swell_before_shot() + shot(bands) + bank_wash() + snaps(bands) + slope()
    return field() + wind_and_thuds() + roof(bench) + bird() + firing


def roll_off(x):
    return signal.sosfilt(signal.butter(12, 17130, fs=SR, output="sos"), x)


# pitch in Hz, level in dB.
TOP_RESPONSE = [(11800, 0.4), (12800, -8.5), (13600, -25.5), (14200, -6.5), (15000, 4.5), (16000, -5.5),
                (16700, -43)]


def record(dry):
    fast = next_fast_len(N)
    hz = np.arange(fast // 2 + 1) * SR / fast
    heard = irfft(rfft(dry, fast) * voltage_ratio(table(TOP_RESPONSE, hz)), fast)[:, :N]
    mix = np.tanh(0.67 * heard) / 0.54
    return roll_off(mix)


dry = scene()
out = record(dry)
to_wav(out)
```